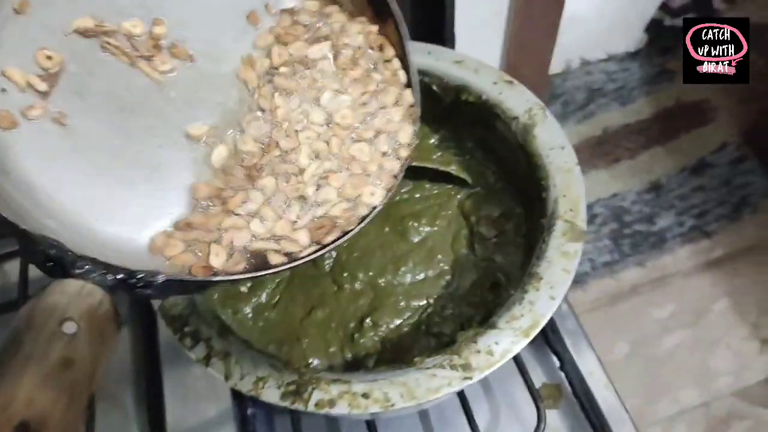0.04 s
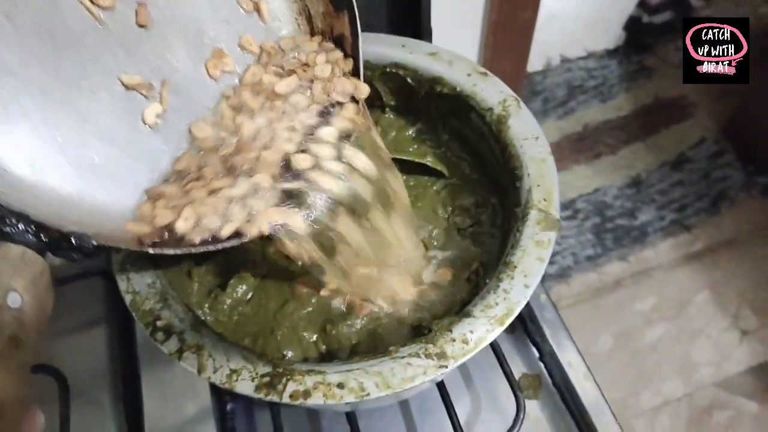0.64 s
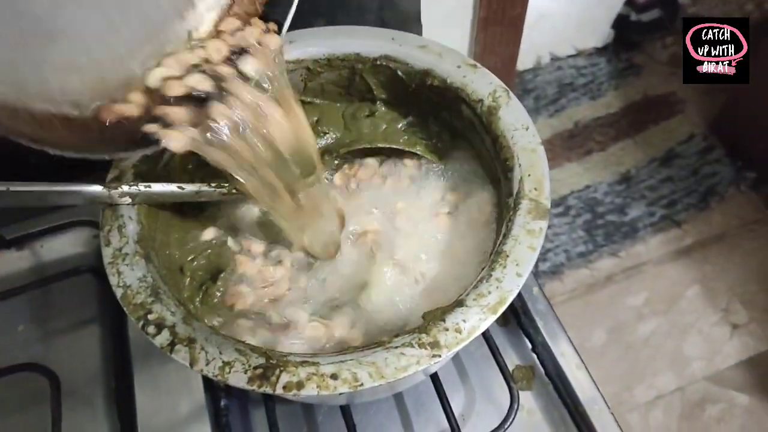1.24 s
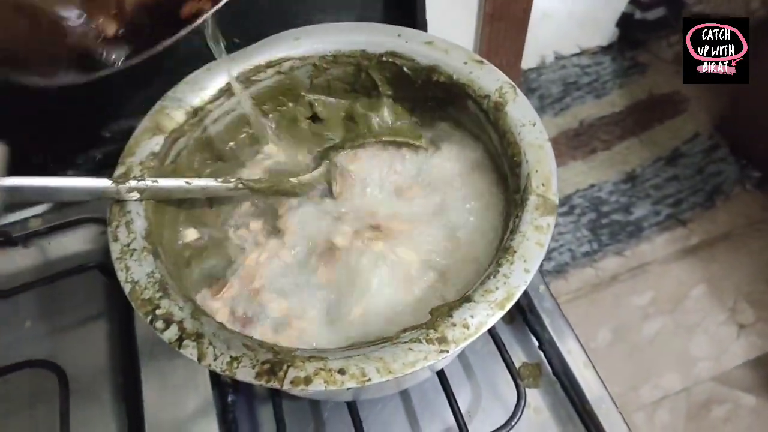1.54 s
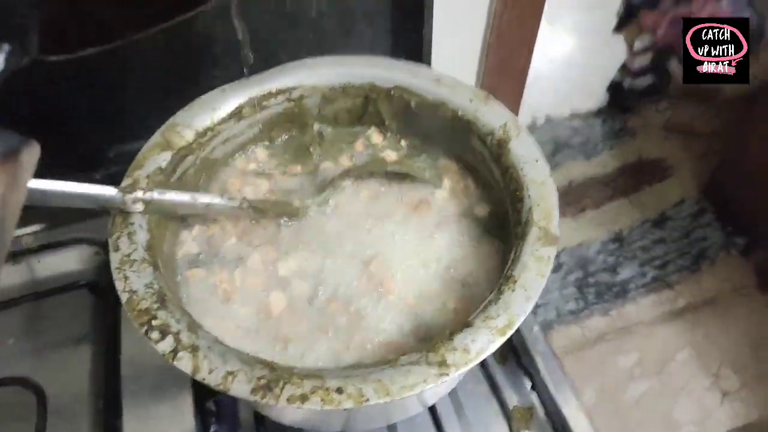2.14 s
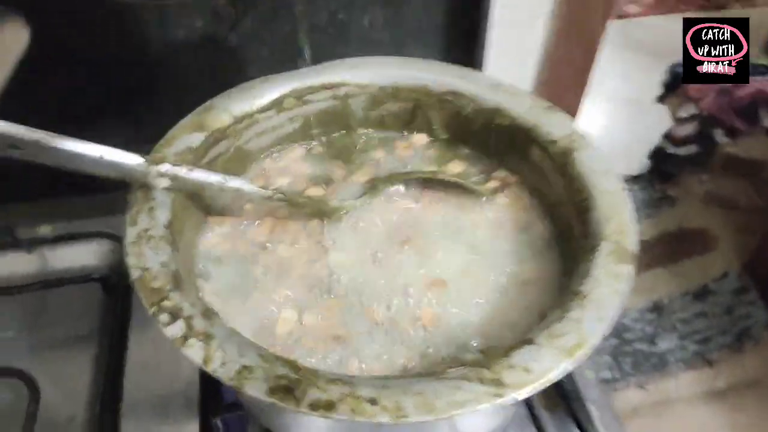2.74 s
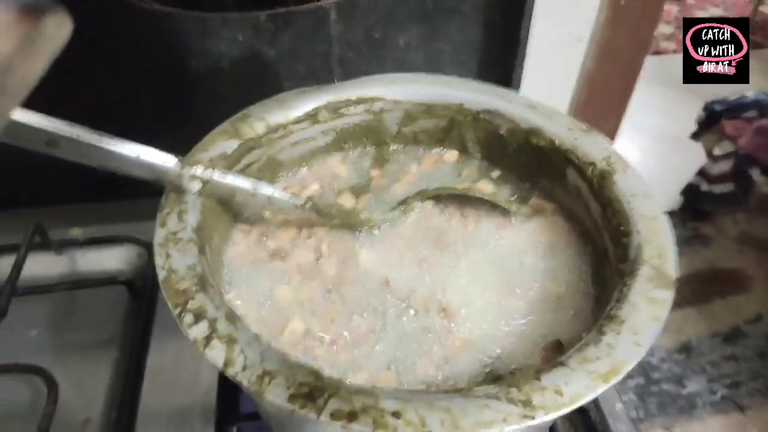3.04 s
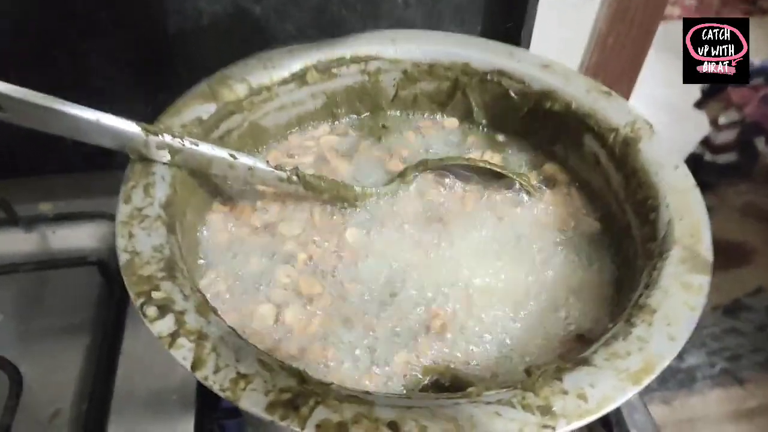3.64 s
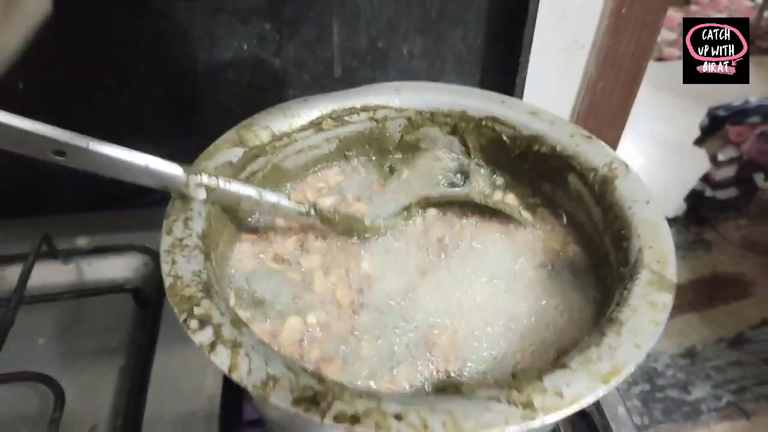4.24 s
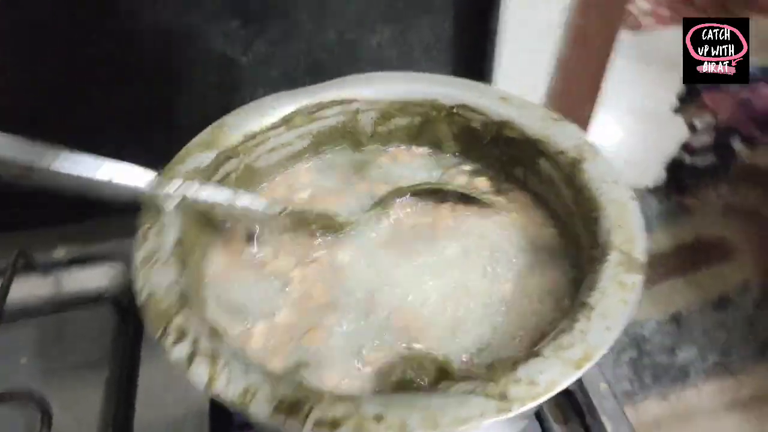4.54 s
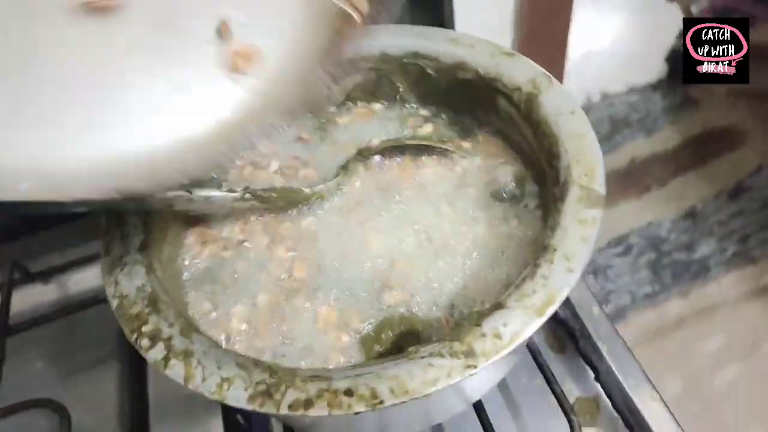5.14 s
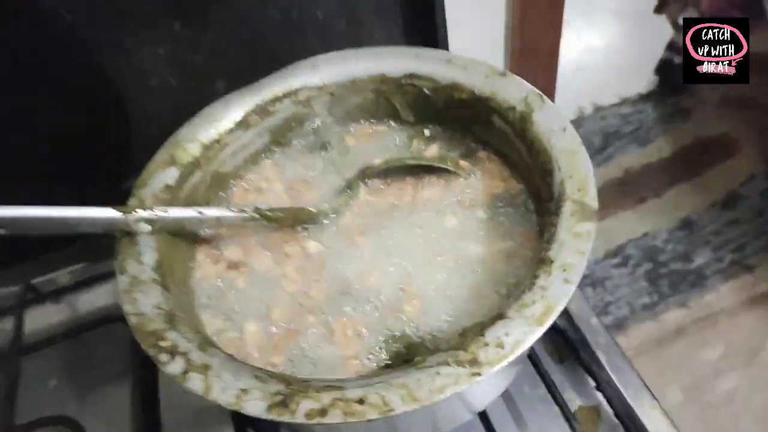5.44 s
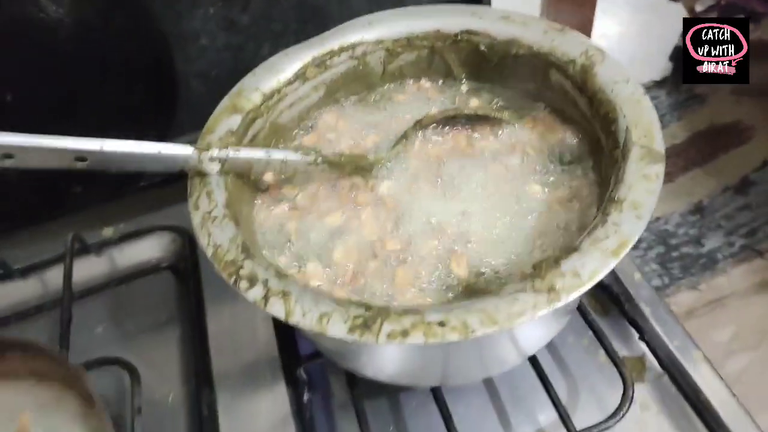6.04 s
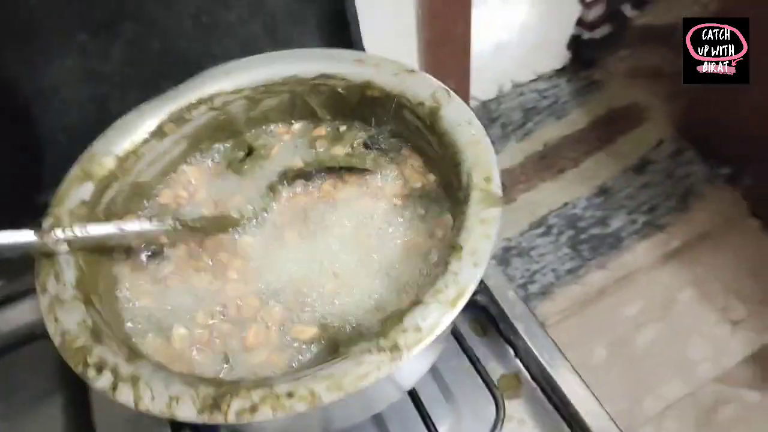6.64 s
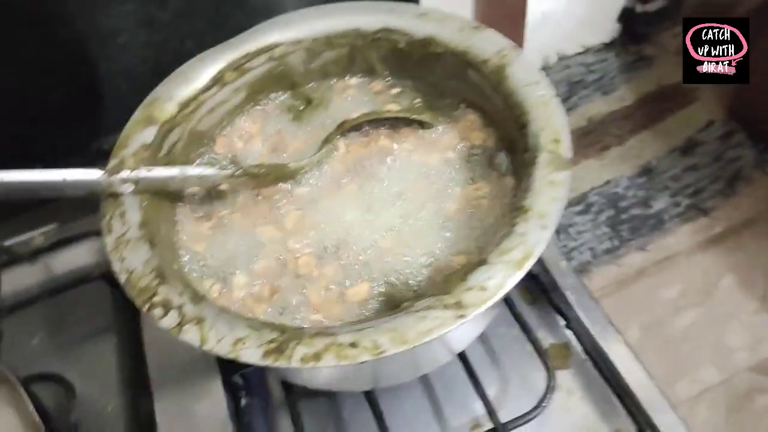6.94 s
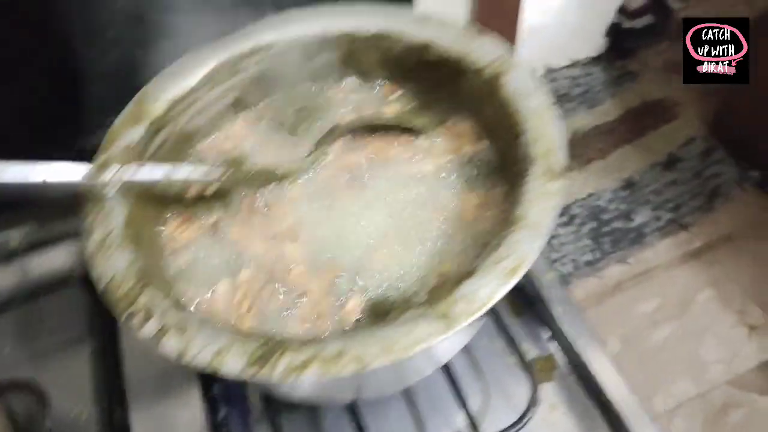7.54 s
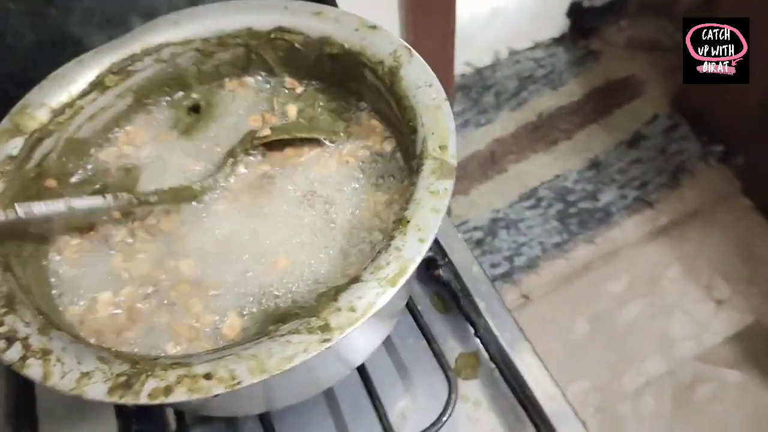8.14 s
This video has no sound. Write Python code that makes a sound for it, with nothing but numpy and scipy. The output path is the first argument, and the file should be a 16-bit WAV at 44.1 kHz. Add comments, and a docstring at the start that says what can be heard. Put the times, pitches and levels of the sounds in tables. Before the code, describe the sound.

Hot oil with fried garlic is poured onto wet greens, sizzling loudly and bubbling, then calming as a pan clanks down.

```python
"""A small kitchen: hot ghee with fried garlic is tipped from a frying pan onto a pot of wet greens.
The garlic patters in first, then water flashes to steam under the fat: big bubbles plop in the
hollow of the pot, small ones crackle, and the foam fizzes and slowly calms. Later the empty pan
is set down, rocks and is nudged, clanking and booming in the stove top. Two unequal microphone
ports pick it all up, through a gain control that ducks on heavy bass."""
import sys
import numpy as np
from scipy import signal
from scipy.fft import rfft, irfft, next_fast_len
from scipy.io import wavfile
from scipy.ndimage import uniform_filter1d, minimum_filter1d, map_coordinates

SR = 44100
rng = np.random.default_rng(int(sys.argv[2]) if len(sys.argv) > 2 else 0)


def bounce(signal):
    """Save signal as a 16-bit WAV file at the path given by the first command-line argument."""
    frames = np.transpose(np.atleast_2d(signal))
    limited = np.clip(frames, -1, 1)
    pcm = np.round(limited * 32767).astype(np.int16)
    wavfile.write(sys.argv[1], SR, pcm)


N = 365588


def amp(db):
    """Decibels to gain."""
    return 10 ** (np.asarray(db) / 20)


def unit(x):
    """Scale to rms 1."""
    return x / np.sqrt(np.mean(x ** 2) + 1e-20)


def along(points, hz):
    """Read (f/Hz, value) points on a log frequency axis."""
    f, v = np.transpose(points)
    return np.interp(np.log(hz + 1), np.log(f + 1), v)


def curves(rows):
    """Automation lanes: one value per sample for each column after the time."""
    s, *cols = np.transpose(rows)
    return [np.interp(np.arange(N) / SR, s, c) for c in cols]


def wobble(rate):
    """Smooth random modulation, rate knots a second."""
    return map_coordinates(rng.standard_normal(int(N * rate / SR) + 4), [np.arange(N) * rate / SR])


def filtered(x, response):
    """Filter x by a function of frequency."""
    m = next_fast_len(N + SR // 2)
    return irfft(rfft(x, m) * response(np.fft.rfftfreq(m, 1 / SR)), m)[..., :N]


def coloured(x, spectrum):
    """EQ x with (f/Hz, level/dB) points and scale to rms 1."""
    return unit(filtered(x, lambda hz: amp(along(spectrum, hz))))


def resonance(hz, centre_hz, width_hz):
    """Band-pass response of one resonator."""
    return 1j * hz * width_hz / (centre_hz ** 2 - hz ** 2 + 1j * hz * width_hz)


def decay(t, t60):
    """An envelope that falls 60 dB in t60 seconds."""
    return amp(-60 * t / t60)


def add(track, s, sound):
    """Mix a sound into a track at time s."""
    part = track[round(s * SR):][:len(sound)]
    part += sound[:len(part)]


def ring(modes, t):
    """One blow on a set of modes, each at a new strength and polarity."""
    partials = (amp(db + rng.normal(0, 1.0)) * decay(t, t60)
                * rng.choice([-1, 1]) * np.sin(2 * np.pi * hz * t) for hz, db, t60 in modes)
    return sum(partials) / np.sqrt(len(modes))


def pops(starts, pitch_hz, life_s, spread_db, rise=0, lag_spread_s=.00014):
    """Bursting bubbles: damped sines of uneven size, each with a stereo lag from its spot in the pot."""
    t = np.arange(int(5 * life_s * SR) + 2) / SR
    size = amp(spread_db * np.minimum(rng.standard_normal(len(starts)), 2.8))
    size *= rng.choice([-1, 1], len(starts))
    phase = 2 * np.pi * pitch_hz[:, None] * t * (1 + rise * t / life_s)
    waves = np.sin(phase) * np.exp(-t / life_s) * size[:, None]
    lag_s = rng.normal(.00018, lag_spread_s, len(starts))  # the right port hears the pot first
    left_starts = np.abs(starts + np.round(lag_s * SR).astype(int))
    slots = [(at[:, None] + np.arange(len(t))).ravel() for at in (left_starts, starts)]
    return unit(np.array([np.bincount(side, waves.ravel(), N)[:N] for side in slots]))


# colour of the room tone: f/Hz, level/dB
ROOM_TONE = [(24, -52), (40, -48), (94, -5), (296, -5.5), (361, -8), (464, -20), (765, -8), (846, -19),
             (1430, -16), (1580, -16.5), (3700, -7.5), (4750, -15), (6920, -6.5), (10900, -14.5),
             (15800, -10)]


def room_tone():
    """A faint, wide bed of steady kitchen noise."""
    return amp(-41.5) * coloured(rng.standard_normal((2, N)), ROOM_TONE)


# reverb time of the kitchen: f/Hz, t60/s
ROOM_DECAY = [(150, 0.73), (1000, 0.47), (5000, 0.15), (15000, 0.26)]
# EQ on the reverb return: f/Hz, level/dB
REVERB_EQ = [(150, -12.5), (700, -10.5), (1500, -3.5), (5000, -9), (12000, 0.5)]


def kitchen(x, tails=28):
    """Adds a soft reverb; crossfaded tails keep it changing, as when bubbles and microphone move."""
    room, hop = np.zeros((2, N + SR)), N // (tails - 1) + 1
    padded = np.pad(x, ((0, 0), (hop, 2 * hop)))
    for k in range(tails):
        hz, t, noise = signal.stft(rng.standard_normal((2, SR // 4)), SR, nperseg=256)
        tail = signal.istft(noise * decay(t, along(ROOM_DECAY, hz)[:, None]), SR, nperseg=256)[1]
        tail /= np.linalg.norm(tail[0])
        piece = padded[:, k * hop:(k + 2) * hop] * signal.windows.cosine(2 * hop)
        for track, answer in zip(room, signal.fftconvolve(piece, tail, axes=1)):
            add(track, k * hop / SR, answer)
    return x + filtered(room[:, hop:hop + N], lambda hz: amp(along(REVERB_EQ, hz)))


def pan_hum(hz=384):
    """The pan hums faintly as it starts to tip."""
    level_db, = curves([(0, -72), (.08, -60), (.14, -49), (.2, -69), (.4, -120)])
    return amp(level_db) * np.sin(2 * np.pi * hz * np.arange(N) / SR + .3 * wobble(20))


# boom of the stove top: f/Hz, level/dB, t60/s
STOVE_MODES = [(102.5, -22, .25), (117.3, -2, 0.35), (159, -2.5, 0.2), (174, -2, 0.17), (214.7, 2, 0.19),
               (257, -1, 0.17), (381, -9.5, 0.28)]
# clank of the pan: f/Hz, level/dB, t60/s
PAN_MODES = [(408, -5, 0.15), (572, -3, 0.12), (695, 2, 0.1), (795, -8, .15), (840, 0, .2), (930, -2, 0.23),
             (1010, 1, 0.11), (1110, 4, 0.074), (1320, -4, 0.12)]
# the pan lands, rocks and is nudged: t/s, relative level/dB, clank over thud/dB, bounce gap/s
PAN_HITS = [(6.003, -6, -1.5, 0.016), (6.067, -12.5, -4, 0.019), (6.11, -16.5, 0, 0.016),
            (6.176, -16.5, -4, .031), (6.259, -26, -12, .02), (6.356, -23, -10, .03),
            (6.441, -29, -19, .025), (6.671, -27.5, -12, .025), (7.937, -23.5, -13, .037),
            (7.999, -25, -10, .025), (8.118, -21.5, -11, .019)]


def pan_knocks(bounces=3, bounce_loss_db=1):
    """The greasy pan bounces at each knock; each contact booms in the stove top, clanks and scuffs."""
    blows, scuffs, t = np.zeros(N), np.zeros(N), np.arange(SR // 3) / SR
    for s, db, clank_db, gap_s in PAN_HITS:
        for k in range(bounces):
            at_s, thud_db = s + k * gap_s, db - k * bounce_loss_db
            blow = ring(STOVE_MODES, t) + amp(clank_db) * ring(PAN_MODES, t)
            scuff = rng.standard_normal(len(t)) * decay(t, 0.13)
            add(blows, at_s, amp(thud_db - 6) * blow)
            add(scuffs, at_s, amp(thud_db + clank_db + 6) * scuff)
    return blows + filtered(scuffs, lambda hz: 1j * hz / (1j * hz + 200) / (1 + 1j * hz / 900))


# hollow of the pot: f/Hz, width/Hz, level/dB
POT_MODES = [(514, 20, 6), (547, 26, -8.5), (681, 52, 4), (775, 22, 5), (855, 58, 0), (1020, 27, -1.5)]


def in_pot(x):
    """The hollow of the pot colours a sound with narrow peaks and dips."""
    return filtered(x, lambda hz: 1 + sum((amp(db) - 1) * resonance(hz, centre, width)
                                          for centre, width, db in POT_MODES))


# garlic dropping into the pot, and a knock on the pot at 4.87 s: t/s, relative level/dB, f/Hz, splash over
# slap/dB
POT_HITS = [(.151, -28, 770, -12), (.158, -25.5, 800, 1), (.181, -38, 790, 14), (.206, -26, 780, 1),
            (.233, -34, 790, 9), (0.249, -35.5, 795, 10), (.412, -30, 810, -7), (.421, -18.5, 1160, -15),
            (0.447, -18.5, 1350, 4), (.480, -18, 800, -8), (0.5, -18.5, 1070, -18), (.795, -21, 800, -9),
            (.824, -13, 795, -8), (4.87, -13, 770, -7)]


def splats_and_knocks():
    """Wet pieces of garlic land, and later the pot is knocked, each with a short pitched slap, a dull splash
    and a soft thud in the stove top."""
    wet, thuds, t = np.zeros(N), np.zeros(N), np.arange(SR // 4) / SR
    for s, db, hz, splash_db in POT_HITS:
        slap = np.sin(2 * np.pi * hz * t) * decay(t, 0.024)
        splash = amp(splash_db) * rng.standard_normal(len(t)) * decay(t, 0.052)
        add(wet, s, amp(db - 3) * (slap + splash))
        add(thuds, s, amp(db - 17.5) * ring(STOVE_MODES, t))
    softened = filtered(wet, lambda hz: 1j * hz / (1j * hz + 200) / (1 + 1j * hz / 3800) ** 4)
    return in_pot(softened) + thuds


# the first thin film of fat sputters until the pool covers it: t/s, relative level/dB
FILM_FADER = [(.42, -62), (.55, -36), (.74, -35), (.85, -33), (1.15, -75), (1.3, -120)]
# the falling stream drums the pot's main note: t/s, level/dB
STREAM_FADER = [(.36, -100), (.43, -42), (.68, -46), (.84, -26), (1.05, -37), (1.2, -100)]


def pouring(film_hz=(1880, 3630)):
    """The stream sounds the hollow of the pot; the spreading film sputters on two clear pitches."""
    film_db, = curves(FILM_FADER)
    stream_db, = curves(STREAM_FADER)
    starts = rng.integers(0, N, (2, int(400 * N / SR)))
    sputter = sum(pops(at, hz * np.exp(0.045 * rng.standard_normal(len(at))), life_s=0.0022, spread_db=5)
                  for at, hz in zip(starts, film_hz))
    note = unit(filtered(rng.standard_normal(N), lambda hz: resonance(hz, 800, 75) ** 2))
    return amp(film_db - 3) * sputter + amp(stream_db) * note


# big drops of water bursting near the microphone: t/s, peak level/dB
DROP_BURSTS = [(6.511, -12), (7.01, -12), (7.2, -8)]


def spitting():
    """Each big drop bursts with one sharp, bright tick."""
    ticks, t = np.zeros(N), np.arange(SR // 100) / SR
    for s, db in DROP_BURSTS:
        tick = np.diff(rng.standard_normal(len(t) + 1)) * decay(t, .0012)
        add(ticks, s, amp(db) * tick / np.abs(tick).max())
    return ticks


# surges and lulls of steam: t/s, half length/s, level change/dB
STEAM_SURGES = [(1.25, 0.04, 0.6), (1.375, 0.066, -3), (1.48, 0.076, 2), (3.785, 0.055, -1.3),
                (4.416, 0.066, 1.3), (4.98, 0.051, -2.1), (5.226, .1, 0.2), (6.44, 0.082, 0.6),
                (6.58, 0.059, -2)]


def boil(held_db, build_db_per_s, full_s, calm_s, loss_db, power):
    """Envelope in dB for one bubble size: builds as the fat spreads, holds, then calms as it cools."""
    t = np.arange(N) / SR
    attack_db = build_db_per_s * np.maximum(full_s - t, 0)
    cooling_db = loss_db * np.maximum(t - calm_s, 0) ** power
    surges_db = sum(db * np.exp(-((t - s) / half_s) ** 2) for s, half_s, db in STEAM_SURGES)
    return held_db - attack_db - cooling_db + surges_db


# plop envelope: relative level/dB, attack/(dB/s), full at t/s, calms from t/s, loss 1 s later/dB, power
PLOP_ENV = (-23, 91, 1.01, 4, 1.53, 0.33)
# the plunging stream makes bigger, deeper bubbles: t/s, f/Hz, pitch scatter/share
PLOP_PITCH = [(.5, 770, 0.039), (.88, 860, 0.063), (1.03, 636, .16), (1.6, 657, 0.23), (2.2, 783, 0.19),
              (8.2, 814, 0.2)]
# colour of the churning mass: f/Hz, level/dB
CHURN_EQ = [(18, -63), (30, -32), (64, -21), (102, -9.5), (182, -9.5), (221, -6), (279, -10), (323, -7.5),
            (455, -8.5), (495, -6), (560, -5.5), (730, -15), (1230, -120)]


def bubbling(rate=950, usual_hz=797, deeper_db_per_octave=7):
    """Big steam bubbles plop in the pot, each bending slightly up, over the low churn of the greens."""
    starts = rng.integers(0, N, int(rate * N / SR))
    centre_hz, scatter = curves(PLOP_PITCH)
    size_db = deeper_db_per_octave * np.log2(usual_hz / centre_hz)  # bigger bubbles are louder
    level_db = boil(*PLOP_ENV) + size_db + 0.44 * wobble(7)
    pitch_hz = centre_hz[starts] * np.exp(scatter[starts] * rng.standard_normal(len(starts)))
    plops = in_pot(pops(starts, pitch_hz, life_s=0.0025, spread_db=4, rise=0.013, lag_spread_s=.0001))
    plops = coloured(plops, [(60, -52), (200, -24), (430, -14), (550, -3.5),
                             (660, 1), (1000, 3.5), (1150, 1), (2500, -7)])
    churn = coloured(rng.standard_normal(N), CHURN_EQ)
    return amp(level_db - 4.5) * plops + amp(level_db - 19.5 + 2.4 * wobble(7.8)) * churn


# colour of the frying foam: f/Hz, level/dB
FOAM_EQ = [(100, -40), (600, -13.5), (1000, -1), (1400, -2.5), (1720, -4.5), (2150, -1), (2800, -1.5),
           (3350, 3.5), (4100, -2), (5700, -4.5), (6850, 1.5), (8300, -7), (11200, -13), (13600, -11.5),
           (15800, -9)]


def foam(lo_hz, hi_hz, rate, life_s, spread_db):
    """A swarm of small bubbles of one size class, rate a second."""
    starts = rng.integers(0, N, int(rate * N / SR))
    return coloured(pops(starts, rng.uniform(lo_hz, hi_hz, len(starts)), life_s, spread_db), FOAM_EQ)


# envelopes of the sizzle layers, dark to bright:
# relative level/dB, attack/(dB/s), full at t/s, calms from t/s, loss 1 s later/dB, power
COARSE_ENV = (-16, 51, 0.97, 4.5, 2.5, 0.82)
CRACKLE_ENV = (-13.5, 61, 0.9, 2.1, 1.5, 0.72)
FIZZ_ENV = (-14.0, 20, 1.24, 4.5, 3, 0.47)
SPRAY_ENV = (-15.5, 20.5, 1.2, 5, 3.5, 0.66)


def sizzle():
    """Five sizes of bubbles and stray droplets burst in the fat; spurts of steam move them together."""
    spurts_db = 0.43 * wobble(11) + 0.43 * wobble(45)
    simmer = foam(1236, 1530, rate=1100, life_s=0.0014, spread_db=3.5)
    simmer *= amp(boil(*PLOP_ENV) - 10)
    coarse = foam(1784, 2990, rate=3600, life_s=0.00084, spread_db=4)
    coarse *= amp(boil(*COARSE_ENV) - 8 + 0.41 * wobble(14))
    crackle = foam(2970, 5300, rate=7000, life_s=0.0003, spread_db=4)
    crackle *= amp(boil(*CRACKLE_ENV) - 7 + 0.41 * wobble(14))
    fizz = foam(5170, 9520, rate=8000, life_s=0.00028, spread_db=3)
    fizz *= amp(boil(*FIZZ_ENV) - 6 + 0.56 * wobble(29))
    spray = foam(8870, 14360, rate=7500, life_s=0.00018, spread_db=3)
    spray *= amp(boil(*SPRAY_ENV) - 7.5 + 0.33 * wobble(10))
    droplets = foam(4000, 13000, rate=52, life_s=.00015, spread_db=4)
    droplets *= amp(boil(*FIZZ_ENV) - 22)
    return (simmer + coarse + crackle + fizz + spray + droplets) * amp(spurts_db)


def scene():
    """Pot and pan in the kitchen reverb, over the room tone."""
    contact, = curves([(.38, 0.033), (.48, 0.98)])  # the fat reaches the greens
    pot = contact * (bubbling() + sizzle()) + pouring() + spitting()
    foley = splats_and_knocks() + pan_knocks() + pan_hum()
    # small things radiate no deep bass
    foley = filtered(foley, lambda hz: (hz ** 2 / (hz ** 2 - 78 ** 2 - 1.3j * 78 * hz)) ** 2)
    return kitchen(pot + foley) + room_tone()


# how the pot lies before the left port: t/s, left minus right/dB, extra port resonance/dB
PORT_AIM = [(.6, 3, 0), (1.1, 1.5, -0.5), (1.7, -1, 0), (2.6, 1.2, -1), (3.7, 0.7, -2.5), (4.6, 2.5, -2.5),
            (5.3, 2, -0.5), (7, 2.5, 0), (8.2, 1.5, 2)]
# tonal mismatch of the ports: f/Hz, left minus right/dB
PORT_BALANCE = [(200, -1.5), (400, -2), (550, -3.5), (900, -6), (1250, -2.5), (1700, -4), (2400, -2.5),
                (3300, 5), (4600, -2.5), (6900, 5), (9500, -3.5), (13500, 5)]
# resonances of the left port: f/Hz, width/Hz
PORT_PEAKS = [(3420, 760), (6850, 1400), (13500, 500)]


def ports(x):
    """Two unequal microphone ports; the left one resonates more when it faces the pot."""
    aim_db, resonance_db = curves(PORT_AIM)
    left, right = filtered(x, lambda hz: amp(np.array([[1], [-1]]) * along(PORT_BALANCE, hz) / 2))
    whistle = filtered(left, lambda hz: sum(resonance(hz, *peak) for peak in PORT_PEAKS))
    left = left + (amp(resonance_db) - 1) * whistle
    return np.array([left * amp(aim_db / 2), right * amp(-aim_db / 2)]) * amp(-.28 * resonance_db)


def ducker(x, threshold_db=-22, look_ahead_s=0.0064, hold_s=.07):
    """A gain control keyed from the bass ducks just before a heavy blow."""
    bass = filtered(x.mean(0), lambda hz: np.exp(2j * np.pi * hz * look_ahead_s) / (1 + (hz / 350) ** 4))
    level = np.sqrt(np.abs(uniform_filter1d(bass ** 2, int(0.013 * SR))) + 1e-12)
    hold = int(hold_s * SR)
    gain = minimum_filter1d(np.minimum(1, amp(threshold_db) / level), hold, origin=hold // 2 - 1)
    return x * uniform_filter1d(gain, int(0.005 * SR))


def record(dry):
    """The microphone chain: ports, ducker, soft clip and band limits."""
    low_cut_hz, top_hz = 25, 15550
    x = ducker(ports(dry))
    x = x / (1 + (x / .93) ** 10) ** (1 / 10)
    return filtered(x, lambda hz: (1j * hz / (1j * hz + low_cut_hz)) ** 2 / (1 + (hz / top_hz) ** 300))


dry = scene()
out = record(dry)
bounce(out)
```